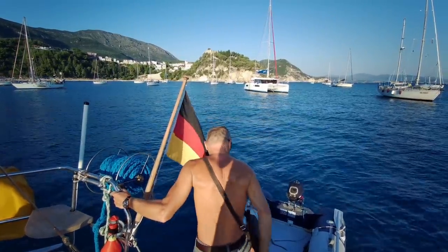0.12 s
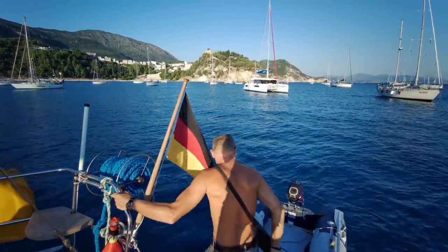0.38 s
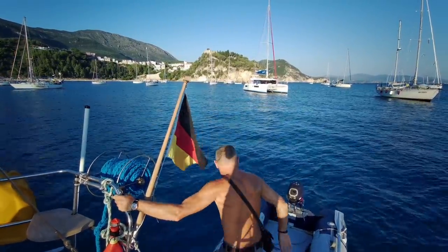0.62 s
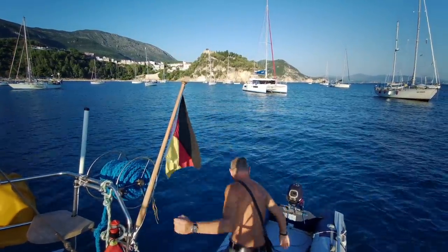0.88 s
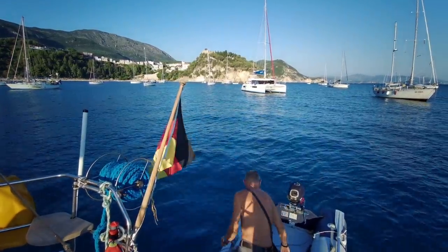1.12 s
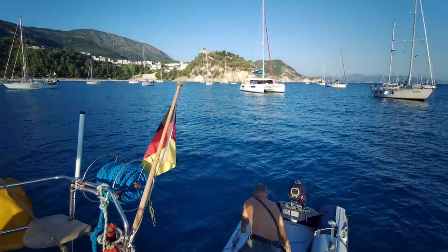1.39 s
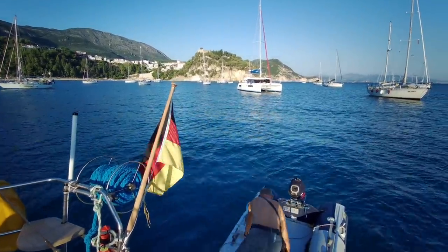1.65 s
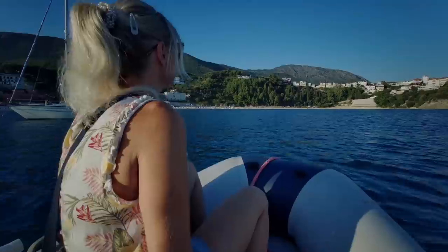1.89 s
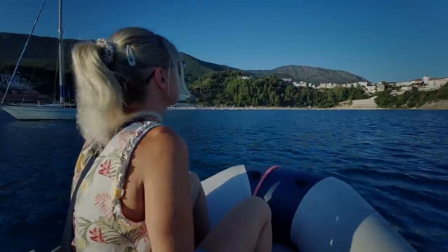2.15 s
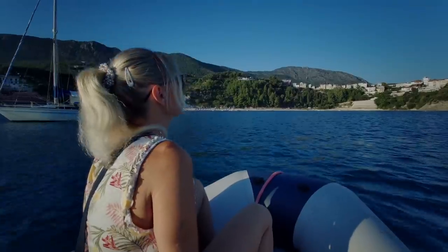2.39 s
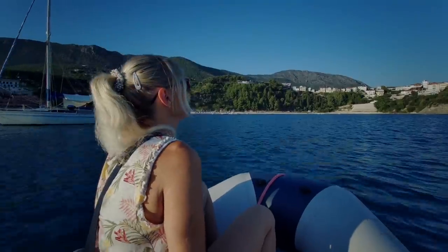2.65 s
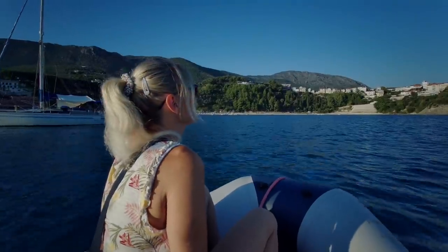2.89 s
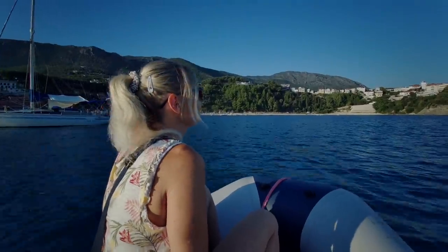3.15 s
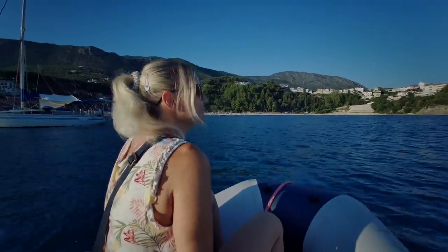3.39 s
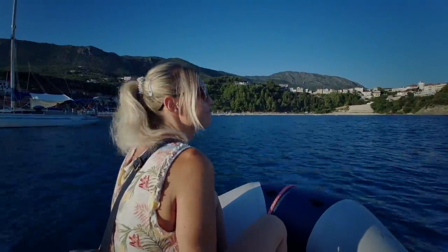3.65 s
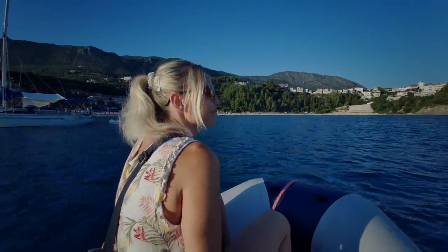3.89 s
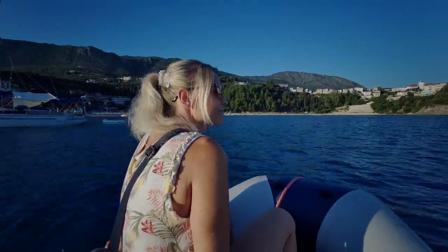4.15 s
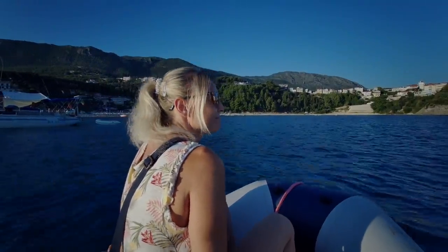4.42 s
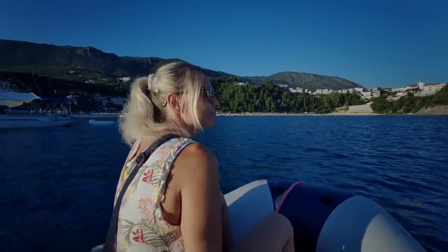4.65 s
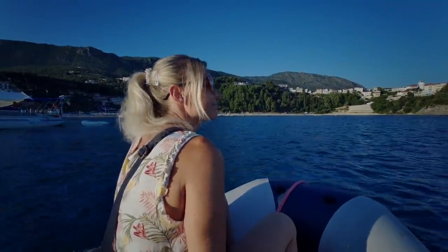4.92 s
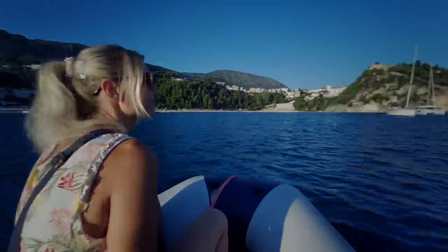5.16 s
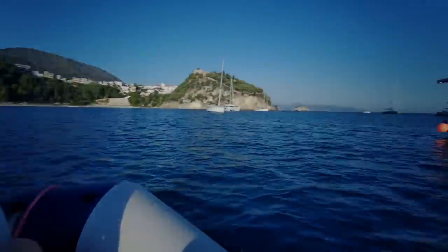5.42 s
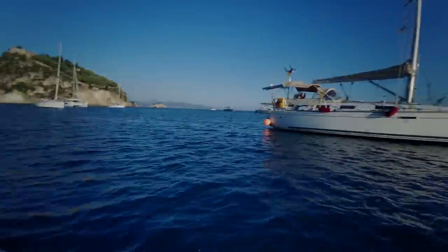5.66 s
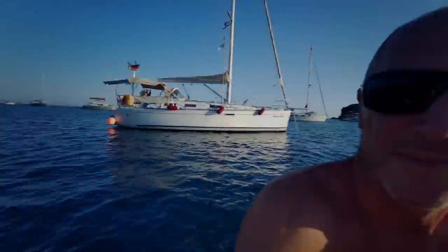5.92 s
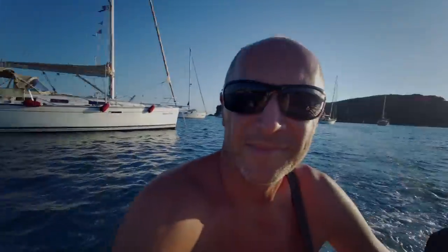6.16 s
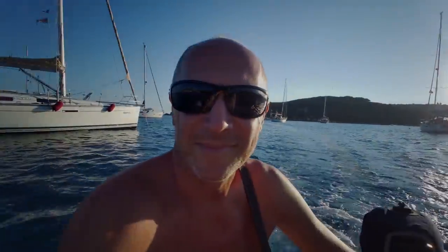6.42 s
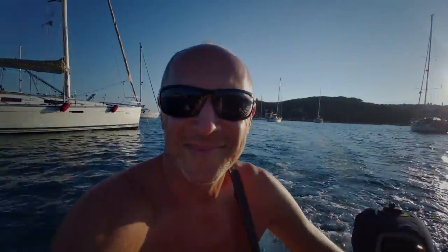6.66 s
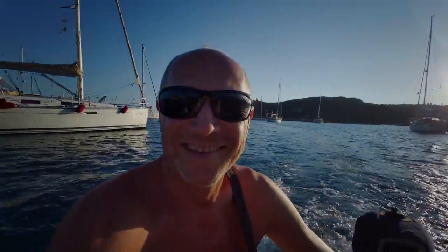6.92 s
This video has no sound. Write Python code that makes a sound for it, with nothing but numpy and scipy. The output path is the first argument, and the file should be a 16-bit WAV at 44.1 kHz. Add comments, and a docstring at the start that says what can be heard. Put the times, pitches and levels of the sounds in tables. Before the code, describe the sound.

From 0 to 1.7 seconds a calm anchorage: soft low lapping, very faint air, distant insects and a barely audible electronic whine. A thin squeal glides upward to about 0.27, then stutters and falls away by 0.4, slightly right. At 0.33 a foot thumps hollowly on a rubber boat; between 0.42 and 0.7 come a surge of water, a cluster of round gulps, wet rubber scuffs, a gritty tick, a low tube hum and a quickly rising slosh. It settles; soft knocks and tiny gulps follow at 1.1 to 1.4, with another faint hum. Around 1.75 it switches quickly to a loud, steady small outboard, a rough fluttering buzz at about 34 cycles per second, beating slowly with the propeller. Underwater exhaust throbs beneath, and rattling spray hisses above, with small splats from 3.3 to 4.1. The motor continues unchanged to the end at about 7 seconds.

```python
"""One-cylinder four-stroke outboard on a rubber boat: engine-order tones, phased by pulses in the cycle, beat
with the propeller; throbbing noise is the exhaust under water, rattled noise with droplet bursts the spray and
wake. It cross-fades in from a quiet anchorage: shaped noise laps at a hull, a thin squeal glides, faint air and
insects. A step on the rubber boat rings hull modes, with gulps, ticks, scuffs, tube hums and a rising slosh.
Two small microphone ports with a faint electronic whine; the left-right difference fades in the bass."""
import sys
import numpy as np
from scipy import signal
from scipy.fft import rfft, irfft
from scipy.io import wavfile
from scipy.ndimage import uniform_filter1d

SR = 44100
rng = np.random.default_rng(int(sys.argv[2]) if len(sys.argv) > 2 else 0)


def boost_factor(decibels):
    """Convert a level in decibels to a linear amplitude factor."""
    exponent = np.asarray(decibels, float) / 20
    return 10 ** exponent


def generate_wav(sig):
    """Save sig (samples, or channels by samples) to the path in sys.argv[1] as 16-bit PCM at SR."""
    pcm = np.round(np.clip(np.atleast_2d(sig).T, -1, 1) * 32767).astype(np.int16)
    wavfile.write(sys.argv[1], SR, pcm)


N = 310905
T = np.arange(N) / SR

# cross-fade into the ride [t/s, share/1]
RIDE_SHARE = [(1.715, 0), (1.76, 0.32), (1.83, 1)]

# port pair: likeness [f/Hz, left-right likeness/1], lead [f/Hz, left lead/rad], shading [f/Hz, left-right level/dB]
PORT_LIKENESS = [(1200, 0.99), (2000, 0.74), (2700, 0.4), (4200, 0.67), (5100, 1), (6000, 0.45),
                 (9000, 0.33), (12000, 0.44), (15000, .4)]
PORT_LEAD = [(0, -4), (1890, 0.4), (2330, 1.8), (3100, 5.5), (4600, 6.1), (5400, 6.5), (6890, 8.5),
             (7240, 9.5), (8960, 10.5), (9820, 11.9), (11200, 12), (12400, 13), (13300, 16.7),
             (14500, 19.6), (16000, 16)]
PORT_SHADING = [(1000, -8), (2000, -11), (4000, 5), (8000, 1), (15000, -1)]
RIDE_SIDE_EDGE_HZ, MOORED_SIDE_EDGE_HZ = 1860, 2580  # left-right difference fades below
MOORED_LEAK_DB = -18  # least gain on the left-right difference at anchor
TOP_EDGE_HZ = 15650

# electronic whine [f/Hz, level/dB]
WHINE_TONES = [(2998, -78), (6002, -76.5), (11999, -64), (14998, -65)]

# air spectrum [f/Hz, relative density/dB]
AIR_SPECTRUM = [(1800, -24), (2500, 0), (6000, -33), (9000, -23), (11500, -22), (13200, 10), (14500, -5),
                (15500, -18)]
AIR_DB = -67.5
CHIRR_HZ, CHIRR_DB, CHIRRS_PER_S = 10500, -82, 27  # far insects

# lapping-water spectrum [f/Hz, relative density/dB]
LAP_SPECTRUM = [(25, -49), (70, -2), (170, -4), (450, -13), (900, -18), (1500, -24.5), (1800, -44),
                (2300, -55.5)]
LAP_DB = -40
# gain added to the lapping as the boat is loaded
SURGE_S, SURGE_DB, SURGE_RISE_DB_PER_S, SURGE_FALL_DB_PER_S = 0.42, -40, 74, 75

SQUEAL_TOP_S, SQUEAL_END_S, SQUEAL_EDGE_S = 0.265, 0.41, 0.014
SQUEAL_START_HZ, SQUEAL_TOP_HZ, SQUEAL_END_HZ = 1640, 2246, 1540  # before blur
CLIMB_BEND, DROP_BEND = 1.6, 3.3  # powers: eases up to the top, breaks away after it
# before flicker and pan; the octave starts at OCTAVE_START_DB
SQUEAL_BASE_DB, OCTAVE_START_DB, OCTAVE_GROWTH_DB_PER_S = -55, -88, 70

# wet scuffs on rubber [t/s, peak gain before flutter/dB]
SCUFF_TIMES = [(.455, -52), (0.486, -32.5), (.54, -41), (.59, -35), (0.674, -33.5), (.85, -57)]
# scuff spectrum [f/Hz, relative density/dB]
SCUFF_SPECTRUM = [(150, -35), (250, -12), (319, -5), (527, -5.5), (708, -21), (1070, -5), (1600, -7),
                  (1870, -35), (2260, -12), (3550, -22), (4080, -18), (7240, -30), (15800, -39)]
SCUFF_RISE_DB_PER_S, SCUFF_FALL_DB_PER_S = 510, 250

SLOSH_S, SLOSH_HOLD_S, SLOSH_GAIN_DB = 0.36, 0.19, -33.5
SLOSH_RISE_DB_PER_S, SLOSH_FALL_DB_PER_S = 300, 250
SLOSH_START_HZ, SLOSH_OCTAVES_PER_S, SLOSH_KNOTS_PER_CYCLE = 205, 10.5, 1.2  # knots set the bandwidth

# air-tube hums [plateau start t/s, hold/s, level before waver/dB, f/Hz]
TUBE_HUMS = [(0.52, 0.16, -34, 152.7), (1.42, .33, -38.5, 157.3)]
TUBE_SLOPE_DB_PER_S = 160
# gritty ticks [t/s, gain/dB, centre f/Hz]
TICK_EVENTS = [(0.1022, -45, 13200), (0.4828, -30.5, 4000), (0.8044, -41, 3990), (1.1847, -48, 13300),
               (1.4426, -45, 13400)]
TICK_T60_S = 0.035
# water gulps [t/s, gain/dB, start f/Hz]
GULP_EVENTS = [(0.184, -32, 910), (0.423, -28, 356), (0.449, -21, 454), (0.475, -14, 406),
               (0.513, -16.5, 523), (0.534, -25, 790), (0.582, -22.5, 1082), (0.6, -37, 1290),
               (0.72, -41, 338), (1.226, -29, 280), (1.283, -34, 269)]
GULP_T60_S, GULP_CLIMB_PER_S = 0.044, 6.1  # climb: share of start pitch

# knocks [t/s, hull peak/dB, crack re peak/dB, gain of modes below 500 Hz/dB, rumble re peak/dB]
HULL_KNOCKS = [(0.333, -12, -20, -4, -12.5), (1.127, -28, -42, -18, -7), (1.39, -30, -45, -1, -20)]
# hull modes [f/Hz, relative level/dB, T60/s]
HULL_MODES = [(101, -9, 0.13), (191.6, 3, 0.12), (345, 5, 0.058), (647, -7, 0.035), (1150, 0, 0.016),
              (1800, -26, 0.0086)]

# wake and spray spectrum [f/Hz, relative density/dB]
WAKE_SPECTRUM = [(1100, -33), (1300, -6), (1650, -13.5), (2150, -8.5), (2640, -16), (3200, -16.5),
                 (5000, -21), (7670, -22), (11100, -23.5), (14800, -24), (15800, -28)]
# engine-cover resonances [f/Hz, width/Hz, gain/dB]
COWL_RESONANCES = [(1530, 120, 2.5), (1795, 77, 5.5), (2260, 110, 4.5), (2964, 88, 6.5), (3140, 58, 8),
                   (3335, 150, 5.5), (3610, 64, 5.5), (4060, 220, 5), (4460, 480, 4), (5570, 220, 3),
                   (11300, 440, 5.5)]
# splats on the tube [t/s, treble gain/dB, body gain/dB]
SPLAT_EVENTS = [(3.3, -40, -26), (3.551, -35, -20), (3.75, -37, -30), (3.847, -37, -21), (3.909, -31, -21),
                (4.057, -30, -11)]
WAKE_START_DB, WAKE_SAG_DB_PER_S, WAKE_SWELL_DB, WAKE_SWELLS_PER_S = -34, 0.28, 0.5, 3

# exhaust boiling under water [f/Hz, relative density/dB]
CHURN_SPECTRUM = [(15, -38), (25, -21), (70, -7), (176, 4), (356, -13), (537, -5), (615, -10), (730, -2),
                  (1500, -13.5), (1950, -62), (3300, -120)]
CHURN_DB = -29.5

# engine speed [t/s, four-stroke cycles per second/Hz]
CYCLE_RATE = [(1.8, 34.142), (2.39, 33.776), (2.56, 33.87), (2.98, 33.562), (3.1, 33.608), (3.7, 33.951),
              (3.83, 33.814), (4.22, 34.36), (4.54, 33.884), (5.18, 34.139), (5.41, 33.847), (5.53, 33.966),
              (5.98, 34.09), (6.11, 33.898), (6.77, 33.908), (7.05, 33.788)]
CYCLE_START_S = 2.0012  # one cycle begins here
# engine orders [multiple of cycle rate/1, relative level/dB]
ORDER_LEVELS = [(1, -24.5), (2, -2), (3, -0.5), (4, -2), (5, 0.5), (6, -1), (7, -18), (8, -8.5), (9, -8.5),
                (10, -12.5), (11, -16), (12, -3.5), (13, -26.5), (14, -8), (15, -5), (16, -4), (17, -9.5),
                (18, -22), (19, -11), (20, -6.5), (21, -3.5), (22, -2.5), (23, -11), (24, -4), (25, -4.5),
                (26, -4.5), (27, -10), (28, -16.5), (29, -10.5), (30, -5.5), (31, -13.5), (32, -11),
                (33, -4.5), (34, -10.5), (35, -25), (36, -53), (37, -27.5), (38, -50), (39, -41), (40, -20),
                (41, -33), (42, -30.5), (43, -40), (44, -16), (45, -51), (46, -27), (47, -53), (48, -26),
                (49, -47), (50, -49), (51, -25), (52, -20.5), (53, -33), (54, -32), (55, -28), (56, -40),
                (57, -45), (58, -44), (59, -42), (60, -44), (61, -21.5), (62, -27), (63, -28), (64, -28.5),
                (65, -33), (66, -32)]
# pulses within the cycle that set the order phases [share of cycle/1, f/Hz, width/Hz, weight/dB]
CYCLE_PULSES = [(0.148, 838, 178, -2.0), (0.329, 1042, 147, -3.5), (0.382, 1118, 222, -1.0),
                (0.417, 529, 185, -1.0), (0.44, 947, 226, -2.5), (0.48, 1451, 248, -4.0),
                (0.559, 734, 159, 3.0), (0.571, 2151, 249, -4.0), (0.618, 468, 76, -3.5),
                (0.635, 82, 31, 0.0), (0.74, 438, 87, -1.5), (0.762, 262, 47, -1.0), (0.787, 149, 24, 0.0),
                (0.799, 859, 226, -4.0), (0.892, 1762, 154, -4.0), (0.973, 199, 44, 0.0)]
# propeller beats [order/1, level re order/dB, lag of strongest sum/cycles, beats per round/1]
PROPELLER_BEATS = [(3, -10.5, 3, 2.2), (4, -9.5, 5.8, 1.002), (5, -11, 18.5, 1.006),
                   (6, -14.5, 10.2, 1.007)]
BEAT_ROUND_CYCLES = 27.9  # geared propeller against engine
ENGINE_DB, PORT_LAG_S = -18.5, 0.0001  # motor reaches the left port earlier


def evened(x):
    """Scales to rms 1 over all channels."""
    return x / np.sqrt(np.mean(x ** 2) + 1e-20)


def read(points, hz):
    """Reads a spectrum table on a log-frequency axis."""
    f, value = np.transpose(points)
    return np.interp(np.log(hz + 1), np.log(f + 1), value)


def add(mix, s, sound):
    """Mixes a sound in at time s."""
    part = mix[..., round(s * SR):][..., :sound.shape[-1]]
    part += sound[..., :part.shape[-1]]


def drift(per_s, count):
    """Rows of unit-normal knots, per_s a second, joined by lines; the last knot holds."""
    knots = rng.standard_normal((count, int(N / SR * 80)))
    at = np.clip(T * per_s, 0, knots.shape[1] - 1)
    return np.array([np.interp(at, np.arange(len(k)), k) for k in knots])


def tent(s, db, rise, fall, hold=0):
    """Gain that climbs to db at time s, holds, and falls; slopes in dB per second."""
    return boost_factor(db - rise * np.maximum(s - T, 0) - fall * np.maximum(T - s - hold, 0))


def ring(hz, t60, climb=0):
    """Exponentially dying tone whose pitch may climb linearly."""
    t = np.arange(4000) / SR
    onset = np.minimum(t / 0.0025, 1)
    return np.sin(2 * np.pi * hz * (t + climb * t ** 2 / 2)) * boost_factor(-60 * t / t60) * onset


def puff(db, t60):
    """Short exponentially dying window."""
    return boost_factor(db - 60 * np.arange(3000) / SR / t60)


def ports(z, other, hz):
    """Port-pair spectra: shared part, phase lead and shading by frequency."""
    same = np.clip(read(PORT_LIKENESS, hz), 0, 0.97)[:, None]
    twist = (np.exp(0.5j * read(PORT_LEAD, hz)) * boost_factor(read(PORT_SHADING, hz) / 2))[:, None]
    return np.array([z * twist, (same * z + np.sqrt(1 - same ** 2) * other) / twist])


def noise(tone, patchy_db, flicker_db, size=512, count=N):
    """Stereo noise from random short-time spectra with patches and wideband flicker."""
    hz = np.fft.rfftfreq(size, 1 / SR)
    frames = count // (size // 4) + 5
    a, b, c, d, patches = rng.standard_normal((frames, len(hz), 5)).T
    patches = uniform_filter1d(patches, size=8, axis=0)
    patches = evened(uniform_filter1d(patches, size=14, axis=1))
    flicker = evened(uniform_filter1d(rng.standard_normal(frames), size=2))
    gain = boost_factor(read(tone, hz)[:, None] + patchy_db * patches + flicker_db * flicker)
    z = ports(a + 1j * b, c + 1j * d, hz) * gain
    return evened(signal.istft(z, nperseg=size, noverlap=size * 3 // 4)[1][:, :count])


def narrowed_bass(x, side_edge_hz, leak):
    """High-passes the left-right difference of a port pair, never below the gain leak."""
    hz = np.fft.rfftfreq(N, 1 / SR)
    gain = np.maximum((1 + (side_edge_hz / (hz + 1)) ** 6.2) ** -0.5, leak)
    side = irfft(rfft(x[0] - x[1]) * gain, N) / 2
    return x.mean(0) + np.array([side, -side])


def whine():
    """Electronics: steady sines, right channel 1.5 rad ahead."""
    phase = np.array([[0], [1.5]])
    return sum(boost_factor(db) * np.sin(2 * np.pi * hz * T + phase) for hz, db in WHINE_TONES)


def air():
    """Faint patchy air noise."""
    return boost_factor(AIR_DB) * noise(AIR_SPECTRUM, patchy_db=3.5, flicker_db=1.5, size=512)


def insects():
    """Far chirr: narrow noise in repeated dying pulses of uneven timing."""
    phase = (T * CHIRRS_PER_S + 0.18 * drift(5, count=1)[0]) % 1
    band = [(CHIRR_HZ - 1200, -40), (CHIRR_HZ, 0), (CHIRR_HZ + 1200, -40)]
    return boost_factor(CHIRR_DB) * evened(np.exp(-phase / 0.12) * noise(band, 1, 1))


def lapping():
    """Water at the hull: low noise with one swell."""
    gain = boost_factor(LAP_DB) + tent(SURGE_S, SURGE_DB, SURGE_RISE_DB_PER_S, SURGE_FALL_DB_PER_S)
    return gain * noise(LAP_SPECTRUM, patchy_db=2.5, flicker_db=0.5, size=1024)


def squeal():
    """Thin tone and octave on one pitch arch, off to the right; stutter and blur grow after the top."""
    before = np.clip(1 - T / SQUEAL_TOP_S, 0, 1)
    after = np.clip((T - SQUEAL_TOP_S) / (SQUEAL_END_S - SQUEAL_TOP_S), 0, 1)
    climb_hz = (SQUEAL_TOP_HZ - SQUEAL_START_HZ) * before ** CLIMB_BEND
    drop_hz = (SQUEAL_TOP_HZ - SQUEAL_END_HZ) * after ** DROP_BEND
    hz = SQUEAL_TOP_HZ - climb_hz - drop_hz
    blur = 0.009 * drift(90, count=1)[0] + 0.008 * after * drift(196, count=1)[0]
    phase = 2 * np.pi * np.cumsum(hz * (1 + blur)) / SR
    gate = np.clip(np.minimum(T, SQUEAL_END_S - T) / SQUEAL_EDGE_S, 0, 1)
    octave_db = OCTAVE_START_DB + OCTAVE_GROWTH_DB_PER_S * np.minimum(T, SQUEAL_END_S)
    octave = (1 - after ** 2) * boost_factor(octave_db) * np.sin(2 * phase)
    tone = boost_factor(SQUEAL_BASE_DB) * np.sin(phase) + octave
    stutter_db = 4.4 * after + (2.0 + 2.5 * after) * drift(90, count=1)[0]
    return boost_factor(np.array([[-5.5], [3.5]])) * gate * tone * boost_factor(stutter_db)


def scuffs():
    """Wet rubber: fluttering noise under sharp tents."""
    hiss = noise(SCUFF_SPECTRUM, patchy_db=3.5, flicker_db=0.5, size=256)
    gain = sum(tent(s, db, SCUFF_RISE_DB_PER_S, SCUFF_FALL_DB_PER_S) for s, db in SCUFF_TIMES)
    return gain * boost_factor(2.0 * drift(140.2, count=1)) * hiss


def slosh():
    """Lumpy noise in a pocket of water whose resonance climbs as it closes."""
    hz = SLOSH_START_HZ * 2 ** (SLOSH_OCTAVES_PER_S * np.clip(T - SLOSH_S, 0, 0.3))
    turns = np.cumsum(hz) / SR
    at = turns * SLOSH_KNOTS_PER_CYCLE % 500
    knots = rng.standard_normal((502, 2)).T
    wobble = np.interp(at, np.arange(502), knots[0]) + 1j * np.interp(at, np.arange(502), knots[1])
    gain = tent(SLOSH_S, SLOSH_GAIN_DB, SLOSH_RISE_DB_PER_S, SLOSH_FALL_DB_PER_S, SLOSH_HOLD_S)
    return gain * (np.exp(2j * np.pi * turns) * wobble).real


def tube_hums():
    """Air tube: low tones with wavering amplitude and phase."""
    out = np.zeros(N)
    for s, hold, db, hz in TUBE_HUMS:
        a, b = 0.33 * drift(44.8, count=2)
        tone = ((1 + a + 1j * b) * np.exp(2j * np.pi * hz * T)).real
        out += tent(s, db, TUBE_SLOPE_DB_PER_S, TUBE_SLOPE_DB_PER_S, hold) * tone
    return out


def ticks():
    """Short dying bursts of band noise."""
    out = np.zeros((2, N))
    for s, db, hz in TICK_EVENTS:
        grit = noise([(hz * 0.62, -30), (hz, 0), (hz * 1.5, -20)], 0, 0, size=256, count=3000)
        add(out, s, puff(db, TICK_T60_S) * np.minimum(T[:3000] / 0.003, 1) * grit)
    return out


def gulps():
    """Water gulps: dying tones of climbing pitch."""
    out = np.zeros(N)
    for s, db, hz in GULP_EVENTS:
        add(out, s, boost_factor(db) * ring(hz, GULP_T60_S, GULP_CLIMB_PER_S))
    return out


def hull_knocks():
    """Foot on the boat: multi-contact blows ring the hull modes, with crack and rumble noise."""
    out = np.zeros((2, N))
    crack = noise([(1000, 4), (3000, -3), (15000, -15)], 0, 0, size=256, count=3000)
    rumble_tone = [(200, -7), (600, 8.0), (1300, -5.0), (2300, -20), (2700, -37)]
    rumble = noise(rumble_tone, 2.9, 2.1, size=256, count=3000)
    rumble_onset = np.minimum(T[:3000] / 0.0026, 1)
    for s, db, crack_db, low_modes_db, rumble_db in HULL_KNOCKS:
        body = sum(boost_factor(g + low_modes_db * (hz < 500)) * ring(hz, t60) for hz, g, t60 in HULL_MODES)
        contacts = (rng.random(700) < 0.012) * rng.standard_normal(700) * puff(-14, 0.035)[:700]
        contacts[0] = -1
        body = np.convolve(body, contacts)
        add(out, s, boost_factor(db) * body / abs(body).max())
        add(out, s, puff(db + crack_db, 0.017) * crack)
        add(out, s, puff(db + rumble_db, 0.15) * rumble_onset * rumble)
    return out


def wake(turns):
    """Spray and wake: hiss through cowl resonances, rattled by the cycle, with droplets and tube splats."""
    hiss = noise(WAKE_SPECTRUM, patchy_db=1.5, flicker_db=0.7, size=1024)
    hz = np.fft.rfftfreq(N, 1 / SR)
    cowl_db = sum(g / (1 + ((hz - f) / w * 2) ** 2) for f, w, g in COWL_RESONANCES)
    hiss = evened(irfft(rfft(hiss) * boost_factor(cowl_db), N))
    rattle = boost_factor(1.37 * np.cos(2 * np.pi * (turns - 0.45)) + 1.3 * np.cos(6 * np.pi * (turns - 0.49)))
    hits = (rng.random(N) < 300 / SR) * boost_factor(2.6 * np.minimum(rng.exponential(1, N), 4))  # 300 per s
    drops = 1 + 0.15 * signal.lfilter([1], [1, -np.exp(-1 / (0.0013 * SR))], hits)
    swell_db = WAKE_SWELL_DB * drift(WAKE_SWELLS_PER_S, count=1)
    out = boost_factor(WAKE_START_DB - WAKE_SAG_DB_PER_S * T + swell_db) * evened(hiss * rattle * drops)
    body = (ring(760, 0.023) + 0.76 * ring(1490, 0.025))[:3000]
    for s, db, body_db in SPLAT_EVENTS:
        treble = puff(db, 0.017) * hiss[:, round(s * SR):][:, :3000]
        add(out, s, treble + boost_factor(body_db) * body)
    return out


def churn(turns):
    """Exhaust boiling under water: low noise throbbing once a cycle."""
    throb = boost_factor(2.15 * np.cos(2 * np.pi * (turns - 0.55)))
    boil = noise(CHURN_SPECTRUM, patchy_db=1, flicker_db=1.5, size=2048)
    return boost_factor(CHURN_DB) * evened(throb * boil)


def cycle():
    """Running count of four-stroke cycles: the integral of the cycle rate."""
    turns = np.cumsum(np.interp(T, *np.transpose(CYCLE_RATE))) / SR
    return turns - turns[round(CYCLE_START_S * SR)]


def engine(turns):
    """Engine orders phased by the pulses, beating with the propeller; timing and firing strength vary."""
    order, db = np.transpose(ORDER_LEVELS)
    hz = order * np.mean(CYCLE_RATE, 0)[1]
    pulses = sum(boost_factor(g) * np.exp(-((hz - f) / w) ** 2 - 2j * np.pi * order * at)
                 for at, f, w, g in CYCLE_PULSES)
    jitter = 0.0019 * drift(30, count=1)[0]  # cycles
    waver_db = 0.7 * drift(6, count=5)
    slip = 0.11 * drift(14, count=5)  # rad, before loose
    blades = {k: boost_factor(g) * np.exp(2j * np.pi * beats * (turns - at) / BEAT_ROUND_CYCLES)
              for k, g, at, beats in PROPELLER_BEATS}
    tone = np.zeros(N)
    for k, g, lag in zip(order, db, np.angle(pulses)):
        j = int(k) % 5
        loose = 1 + (k / 40) ** 2  # high orders lose step sooner
        spin = np.exp(1j * (2 * np.pi * k * (turns + jitter) + lag + loose * slip[j]))
        tone += boost_factor(g + loose * waver_db[j]) * (spin * (1 + blades.get(k, 0))).real
    firing = (np.maximum(turns + 20, 0) + 0.7).astype(int)
    firing_db = 0.37 * rng.standard_normal(400)[firing]
    tone = evened(tone * uniform_filter1d(boost_factor(firing_db), size=200))
    lead = [[0.5], [-0.5]] * np.gradient(tone) * PORT_LAG_S * SR  # first-order delay between ports
    return boost_factor(ENGINE_DB) * (tone + lead)


def scene():
    """The anchorage cross-fades into the ride."""
    turns = cycle()
    ride = np.interp(T, *np.transpose(RIDE_SHARE))
    anchorage = air() + insects() + lapping() + squeal()
    step = scuffs() + slosh() + tube_hums() + ticks() + gulps() + hull_knocks()
    moored = narrowed_bass(anchorage + step, MOORED_SIDE_EDGE_HZ, boost_factor(MOORED_LEAK_DB))
    under_way = narrowed_bass(wake(turns) + churn(turns) + engine(turns), RIDE_SIDE_EDGE_HZ, 0)
    return (1 - ride) * moored + ride * under_way


def top_cut(x):
    """Nothing passes above the cut-off."""
    return signal.sosfilt(signal.butter(12, 16470, fs=SR, output="sos"), x)


def record(dry):
    """Adds the whine and cuts the top."""
    hz = np.fft.rfftfreq(N, 1 / SR)
    mix = irfft(rfft(dry + whine()) * (hz < TOP_EDGE_HZ), N)
    return top_cut(mix)


dry = scene()
out = record(dry)
generate_wav(out)
```